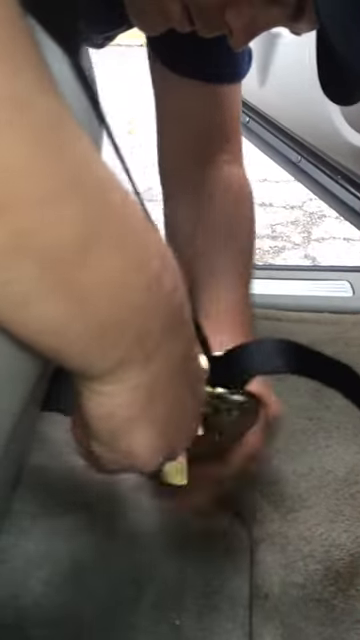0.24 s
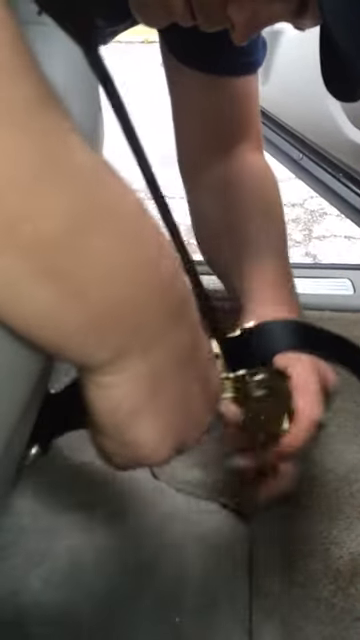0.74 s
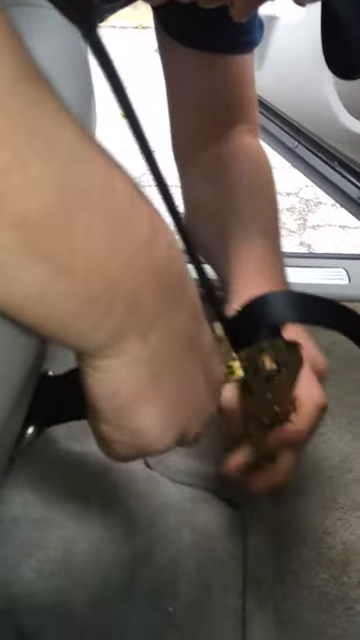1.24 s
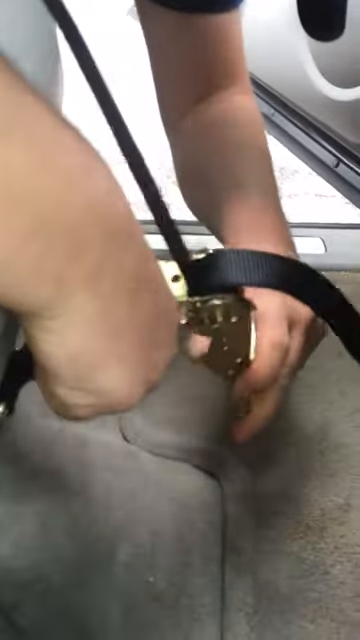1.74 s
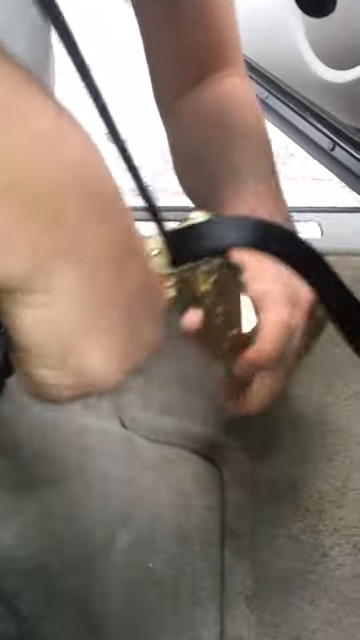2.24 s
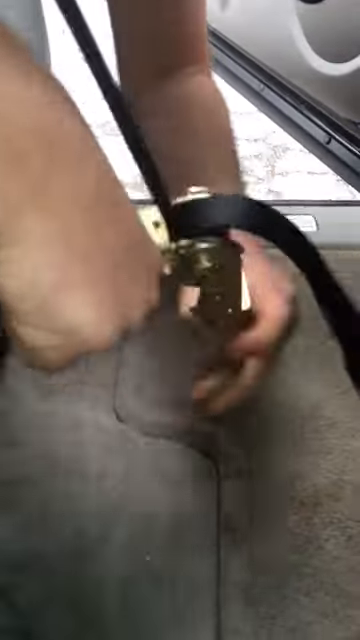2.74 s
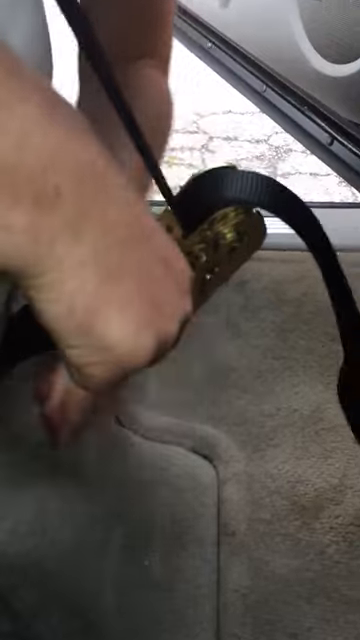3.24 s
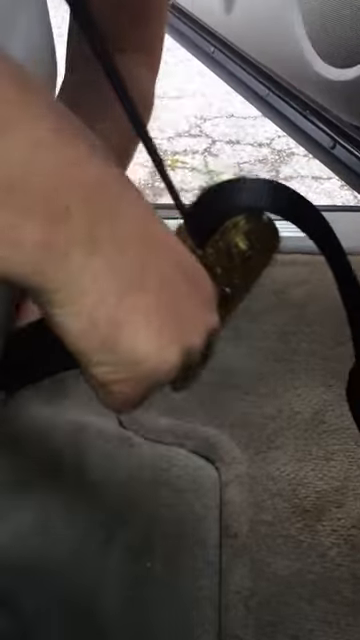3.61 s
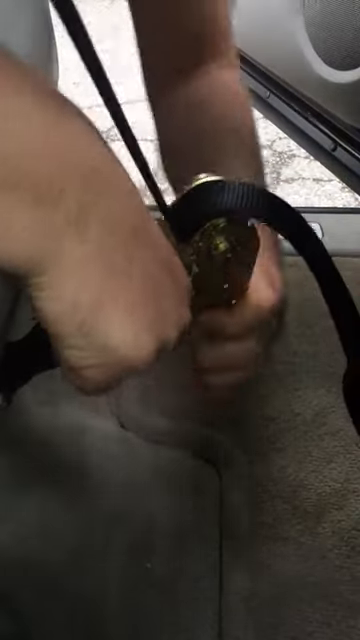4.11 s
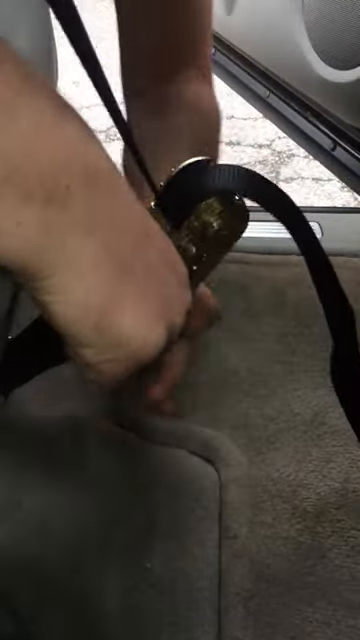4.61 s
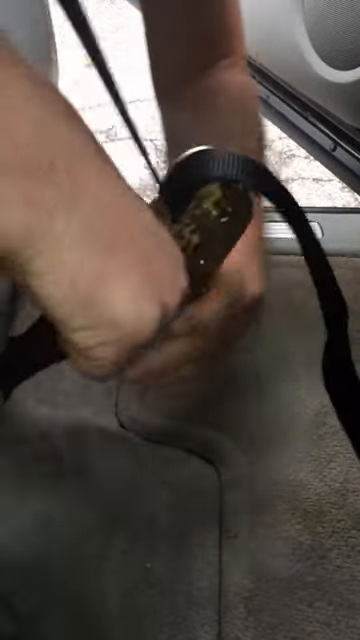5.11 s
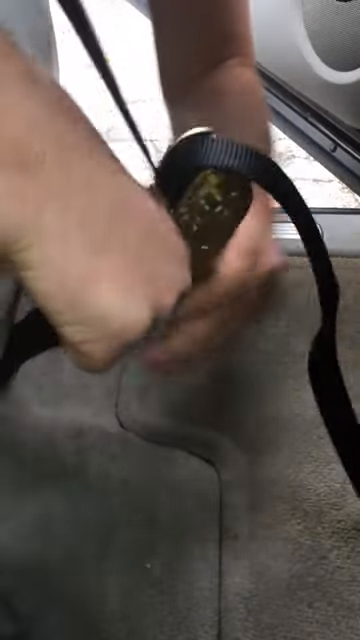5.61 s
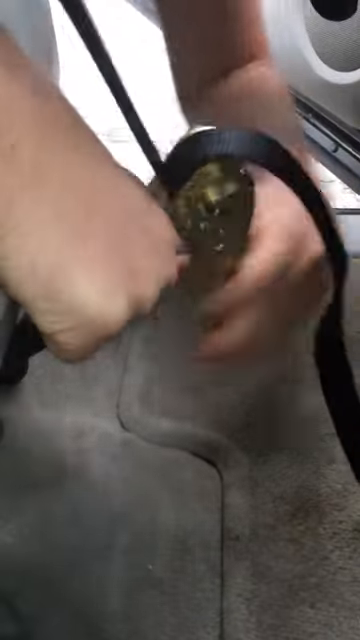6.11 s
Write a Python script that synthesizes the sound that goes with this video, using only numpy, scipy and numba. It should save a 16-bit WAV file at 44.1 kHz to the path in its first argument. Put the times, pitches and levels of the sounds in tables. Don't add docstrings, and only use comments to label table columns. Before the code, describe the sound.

Sharp metallic ratchet clicks in uneven pairs, with dull jolts, a clattering drop midway, then more cranking over a soft distant road hum.

```python
import sys
import numpy as np
from scipy import signal
from scipy.fft import rfft, irfft
from scipy.io import wavfile
from scipy.ndimage import uniform_filter1d
from numba import njit

SR = 44100
rng = np.random.default_rng(int(sys.argv[2]) if len(sys.argv) > 2 else 0)


def waveform_to_disk(signal):
    frames = np.transpose(np.atleast_2d(signal))
    scaled = np.clip(frames, -1, 1) * 32767
    samples = np.round(scaled).astype(np.int16)
    wavfile.write(sys.argv[1], SR, samples)


def natural_amplitude(level_db):
    exponent = np.asarray(level_db, float) / 20
    return 10 ** exponent


N = 280035


def tone_db(table, hz):
    table_hz, table_db = np.transpose(table)
    return np.interp(np.log(hz), np.log(table_hz), table_db)


def coloured(table):
    hz = np.arange(1, N // 2 + 2) * SR / N
    x = irfft(rfft(rng.standard_normal(N)) * natural_amplitude(tone_db(table, hz)), N)
    return x / np.std(x)


def band(x, lo_hz, hi_hz, order):
    return signal.sosfilt(signal.butter(order, [lo_hz, hi_hz], "band", fs=SR, output="sos"), x)


def highpass(x, hz, order):
    return signal.sosfilt(signal.butter(order, hz, "high", fs=SR, output="sos"), x)


def walk(rate):
    k = int(SR / rate)
    steps = np.repeat(rng.standard_normal(N // k + 1), k)
    return 1.1 * uniform_filter1d(uniform_filter1d(steps, k), k)[:N]


@njit
def ring_loop(n, start, pole, size, length):
    out = np.zeros(n)
    for k in range(len(start)):
        z = size[k] + 0j
        for i in range(start[k], min(n, start[k] + length[k])):
            out[i] += z.imag
            z *= pole[k]
    return out


def ring(s, hz, db, t60):
    s, hz, db, t60 = (v.ravel() for v in np.broadcast_arrays(s, hz, db, np.clip(t60, .002, 1)))
    turn = 2j * np.pi * np.clip(hz, 20, .45 * SR) / SR
    pole = np.exp(turn - np.log(1000) / (t60 * SR))
    audible = t60 * SR * np.clip((db + 85) / 60, 0, 1)
    start = np.maximum(s * SR, 0).astype(np.int64)
    return ring_loop(N, start, pole, natural_amplitude(db), audible.astype(np.int64))


# f/Hz, level/dB [per Hz]
OUTSIDE = [(25, -14.5), (60, -5.5), (100, -5), (300, -19), (650, -8.5), (1200, -15), (2200, -20),
           (3500, -27.5), (12000, -45), (16000, -57.5)]


def traffic():
    return coloured(OUTSIDE) * natural_amplitude(-59 + 0.56 * walk(0.92))


# t/s, f/Hz [band centre], level/dB
ROAD = [
    (0, 790, -60),
    (.5, 800, -61),
    (1.0, 680, -63),
    (1.5, 720, -68),
    (3.2, 960, -67),
    (6.35, 743, -73.5),
]


def road():
    s, *columns = np.transpose(ROAD)
    hz, db = (np.interp(np.arange(N) / SR, s, c) for c in columns)
    turn = 2 * np.pi * np.cumsum(hz * (1 + 0.03 * walk(5))) / SR
    return natural_amplitude(db) * (walk(330) * np.cos(turn) + walk(330) * np.sin(turn))


def whistle(notes, start, tremor_db):
    out = np.zeros(N)
    tremor = natural_amplitude(tremor_db * walk(45)) * (1 + .3 * walk(500))
    for s, length, hz0, hz1, db in notes:
        n, i = int(length * SR), int(s * SR)
        phase = 2 * np.pi * np.cumsum(np.linspace(hz0, hz1, n)) / SR
        swell = np.hanning(n) ** 0.22 * np.linspace(start, 1, n)
        out[i:i + n] += natural_amplitude(db) * swell * np.sin(phase)
    return out * tremor


# t/s, length/s, start f/Hz, end f/Hz, level/dB
BIRD = [
    (3.188, .025, 3800, 4300, -62),
    (3.203, .085, 3560, 3150, -58),
    (4.058, .15, 4630, 4630, -52),
    (4.28, .05, 3060, 3050, -58),
    (4.538, .1, 3390, 3330, -58),
    (4.635, .075, 3380, 3260, -57),
]


def bird():
    return whistle(BIRD, start=.45, tremor_db=1.6)


# t/s, rumble level/dB
HANDS = [(0.0, -71), (0.74, -55), (1.18, -67), (1.64, -66), (1.86, -65), (2.03, -72.5), (2.6, -64),
         (2.97, -48.5), (3.16, -81), (3.43, -49.5), (3.66, -40.5), (4.05, -53), (4.46, -48), (5.31, -68.5),
         (6.07, -52.5), (6.35, -42)]


def handling():
    rumble_db = np.interp(np.arange(N) / SR, *np.transpose(HANDS)) - 1.5
    spectrum = [(25, -21.5), (60, 8.5), (110, 7.5), (200, -3.5), (450, -9.5), (900, -37.0)]  # (Hz, dB per Hz)
    return coloured(spectrum) * natural_amplitude(rumble_db + 0.62 * walk(25))


# t/s [middle], half width/s, level/dB
RUSTLES = [
    (3.387, 0.042, -63),
    (3.46, 0.025, -64.5),
    (3.83, 0.056, -65),
    (0.061, 0.035, -72),
    (4.298, 0.069, -61),
    (4.879, 0.042, -67),
    (6.05, 0.21, -64),
]


def webbing():
    t = np.arange(N) / SR
    slide = natural_amplitude(-77)
    for s, half_width, db in RUSTLES:
        slide = slide + natural_amplitude(db) * np.exp(-((t - s) / half_width) ** 2)
    grains = rng.standard_normal(N) * natural_amplitude(1.8 * walk(230))
    return band(grains, 3100, 10000, order=2) * slide * natural_amplitude(5.5 + 2.6 * walk(12))


def cabin(x):
    t = np.arange(int(.25 * SR)) / SR
    noise = rng.standard_normal(len(t))
    tail = band(noise, 210, 3300, order=1) * natural_amplitude(-60 * t / .13)
    tail += 0.25 * band(noise, 4000, 14000, order=1) * natural_amplitude(-60 * t / 0.011)
    tail += 0.026 * band(noise, 4500, 15000, order=1) * natural_amplitude(-60 * t / 0.37)
    tail *= 1 - np.exp(-t / 0.0012)
    return signal.fftconvolve(x, tail / np.linalg.norm(tail))[:N]


# t/s, push level/dB, direction [sign]
JOLTS = [(0.1602, -30, -1), (0.3973, -26, -1), (0.67, -21.5, -1), (0.764, -23, -1), (0.8681, -7.5, -1),
         (0.9047, -11, -1), (1.1768, -15.5, 1), (1.4215, -23.5, -1), (1.6711, -7.5, 1), (1.742, -23.5, -1),
         (1.9797, -7, -1), (2.0545, -35, 1), (2.3056, -6.5, 1), (2.544, -38, -1), (2.8117, -9, 1),
         (3.0636, -10, -1), (4.9867, -28, 1), (5.2506, -13.5, -1), (5.506, -28.5, 1), (5.6873, -10.5, 1),
         (5.77, -40, 1)]
# t/s, level/dB, direction [sign], f/Hz
SNAPS = [(0.3977, -26.5, -1, 890), (0.6677, -22.5, -1, 475), (0.6684, -24.5, 1, 480),
         (0.7653, -23.5, -1, 603), (.7675, -22, 1, 420), (.8663, -15.5, 1, 520), (.8672, -6, -1, 400),
         (0.9014, -10.5, 1, 352), (.904, -14.5, -1, 503), (1.1752, -22, 1, 590), (1.4204, -16, -1, 600),
         (1.422, -16.5, 1, 507), (1.6689, -10.5, 1, 452), (1.7419, -23, -1, 600), (1.9782, -27, -1, 446),
         (1.9802, -9.5, 1, 350), (2.0548, -34, 1, 610), (2.305, -12.5, 1, 358), (2.5454, -10.5, -1, 470),
         (2.8116, -11, -1, 426), (3.0637, -12.5, 1, 430), (4.9874, -24.5, 1, 400), (5.248, -11, 1, 588),
         (5.505, -19, -1, 558), (5.6858, -14, -1, 417), (5.7702, -23, -1, 560)]


def jolts():
    t, push = np.arange(-500, 500) / SR, np.zeros(N)
    rattle = band(rng.standard_normal(N), 230, 1300, order=1) * 4
    for s, db, way in JOLTS:
        i = int(s * SR) - 500
        push[i:i + 1000] += np.sign(way) * natural_amplitude(db - 2.5) * np.exp(-(t / 0.002) ** 2)
    for s, db, way, hz in SNAPS:
        i = int(s * SR) - 500
        wiggle = natural_amplitude(db - 1.5) * np.exp(-(t * hz / 0.41) ** 2) * np.cos(2 * np.pi * hz * t)
        crack = natural_amplitude(db - 1.0) * np.exp(-(t / 0.00035) ** 2) * np.sin(2 * np.pi * 1700 * t)
        shake = natural_amplitude(db - 10.5) * np.exp(-abs(t) / 0.0021) * rattle[i:i + 1000]
        push[i:i + 1000] += np.sign(way) * (wiggle + crack + shake)
    mount_hz, rebound_hz = 39.55, 30
    swing = signal.sosfiltfilt(signal.butter(2, mount_hz, "high", fs=SR, output="sos"), push)
    return highpass(swing, rebound_hz, order=1)


# t/s, trim level/dB, hook ring level/dB, carpet thud level/dB
KNOCKS = [(0, -47, -33.5, -87.5), (5.201, -60, -80, -36), (5.22, -34, -80, -32.5), (3.309, -76, -85, -42.5),
          (0.544, -35, -39, -90), (0.842, -28, -68.5, -57.5), (5.715, -40, -70, -34.5),
          (1.583, -32.5, -25, -75), (1.795, -25.5, -54, -57), (1.811, -34, -77, -36),
          (1.894, -33, -50, -32), (2.56, -29, -55.5, -35.5), (2.86, -25.5, -40, -27.5),
          (2.87, -24.5, -66, -42), (3.072, -27, -77, -29.5), (3.099, -38.5, -77, -31),
          (3.488, -11, -43, -39.5), (3.496, -14, -60, -20), (3.508, -20.5, -56, -19.5),
          (3.567, -19.5, -60, -21), (3.62, -23.5, -63.5, -27), (3.633, -36.5, -72.5, -30),
          (3.699, -37, -61, -34), (3.771, -25, -66, -24.5), (3.797, -44, -72, -33), (3.877, -27, -55, -65),
          (3.893, -45, -63, -27), (6.206, -44, -61, -30.5)]
# f/Hz, level/dB, t60/s
TRIM = [(400, 1.5, 0.059), (520, 4.5, 0.055), (673, 2, 0.08), (870, -1.5, 0.097), (1157, 4, 0.025),
        (1438, 2, 0.052), (1750, 3, 0.027), (2310, 0, 0.044), (3140, -6, 0.055)]
# f/Hz, level/dB, t60/s
HOOK = [(3241, -13, .12), (5270, -8, .2), (6562, -10, .14), (8522, -13, .14), (11070, -4, .1),
        (12920, -22, .08)]
# f/Hz, level/dB, t60/s
CARPET = [(85, -38, 0.049), (125, -4.5, 0.16), (165, -9.5, 0.14), (233.6, 5.5, 0.11)]


def hook():
    s, *levels = np.transpose(KNOCKS)[:, :, None]
    out = 0
    for db, body, spread in zip(levels, (TRIM, HOOK, CARPET), (.07, .0006, 0.11)):
        hz, mode_db, t60 = np.tile(np.transpose(body), 8)
        luck = rng.standard_normal((len(s), 3, len(hz)))
        late_s = 0.004 * abs(luck[:, 2])
        strike_db = db + mode_db - 19.0 + 2 * luck[:, 1]
        out = out + ring(s + late_s, hz * (1 + spread * luck[:, 0]), strike_db, t60)
    return out


# t/s, f/Hz, level/dB, t60/s
SQUEAKS = [
    (1.797, 673, -46, 0.066),
    (1.801, 244, -54, 0.088),
    (3.492, 478, -32, 0.021),
    (3.504, 156, -32.5, 0.084),
    (3.63, 146, -41, 0.1),
    (1.895, 673, -49, 0.14),
    (4.715, 1906, -36.5, 0.028),
    (4.715, 3995, -30, 0.027),
]
# t/s, f/Hz, level/dB, t60/s
RINGS = [
    (3.775, 6100, -67, .6),
    (3.985, 8060, -67, .45),
    (3.495, 5300, -41, .25),
    (1.59, 5270, -41, .3),
    (1.797, 1432, -55, .4),
    (1.797, 2148, -47, .27),
    (1.797, 2530, -52, .5),
    (1.797, 3241, -54, .22),
]


def squeaks():
    s, hz, db, t60 = np.transpose(SQUEAKS)[:, :, None]
    luck = rng.standard_normal((len(s), 2, 6))
    pings = ring(s + 0.0024 * abs(luck[:, 0]), hz * (1 + 0.0031 * luck[:, 1]), db + 8.5, t60)
    return pings + ring(*np.transpose(RINGS))


# t/s, length/s, start f/Hz, end f/Hz, level/dB
SQUEALS = [
    (3.066, 0.033, 2730, 2660, -28.5),
    (6.243, 0.038, 1696, 1535, -31),
    (6.25, 0.019, 3330, 3190, -25),
]


def squeals():
    return whistle(SQUEALS, start=1, tremor_db=0.93)


# t/s, slip level/dB, fall/ms, landing level/dB
LOADED = [(.152, -10, 5.4, -11.5), (.3917, -9.5, 4.9, -10.5), (.6598, -15, 6.7, -8),
          (.8601, -10, 7.2, -13.5), (.9002, -12, 4.3, -7.5), (1.1632, -15, 8.8, -10),
          (1.4163, -6, 0.73, -6.5), (1.656, -22.5, 9.4, -8.5), (1.7344, -10.5, 5.3, -7.5),
          (1.9705, -16.5, 5.9, -8.5), (2.0364, -19.5, 13.7, -7.5), (2.2943, -18, 11, -9.5),
          (2.5362, -24.5, 5.5, -5), (2.8034, -19.5, 6.4, -9.5), (3.0586, -5.5, 2.02, -21.5),
          (4.398, -22, 6.2, -12.5), (4.9838, -18.5, 4, -9.5), (5.2397, -20, 7.6, -7.5),
          (5.4979, -6.5, 6.2, -12), (5.753, -24, 15.2, -8.5)]
# t/s, slip level/dB, fall/ms, landing level/dB
FREE = [(.3351, -22, 3.3, -19), (0.5776, -41, 6.3, -18.5), (.73, -23, 12, -20), (1.1024, -22.5, 6.3, -28.5),
        (1.2892, -35, 9.8, -22), (1.4408, -20, 6.9, -6), (1.888, -30.5, 9.8, -22), (2.236, -12, 8.7, -15),
        (2.421, -26, 11, -21.5), (2.7546, -19.5, 3.6, -16.5), (2.9725, -22.5, 8.1, -18),
        (3.0027, -20, 8.4, -21), (4.216, -24.5, 11.4, -24.5), (4.432, -16.5, 5.9, -12),
        (4.7105, -21, 5, -10.5), (4.9706, -25.5, 8.2, -17.5), (5.154, -26, 7.1, -27),
        (5.1721, -22.5, 6.1, -13), (5.483, -21, 9, -18.5), (5.9989, -13, 11.6, -10.5),
        (6.2288, -20, 6, -21), (6.2403, -16.5, 14, -14)]


def tooth_falls():
    rows = []
    for table, slip_bright_db, land_bright_db in ((LOADED, 9.5, 5.5), (FREE, 3, 4.5)):
        for s, slip_db, fall_ms, land_db in table:
            rows.append((s, slip_db, slip_bright_db))
            rows.append((s + fall_ms / 1000, land_db, land_bright_db))
    return rows


# t/s, level/dB
CLICKS = [(0.1036, -18), (0.1461, -23), (0.3221, -22), (0.385, -23.5), (0.6142, -10.5), (0.762, -10),
          (0.797, -21), (0.9, -22), (.927, -24), (1.0714, -11.5), (1.1522, -28), (1.7278, -20),
          (1.9894, -18.5), (2.2252, -20.5), (2.2842, -15.5), (2.4403, -24), (2.7229, -14.5), (2.7928, -22),
          (2.8827, -17.5), (3.7119, -11.5), (3.882, -19), (4.201, -21), (4.3454, -19.5), (4.3913, -20),
          (4.7727, -10), (5.403, -24), (5.686, -10.5), (6.0965, -13), (6.1989, -23)]
# t/s, level/dB
TICKS = [(0.3029, -30), (0.5424, -34), (.776, -35), (.885, -24), (1.0393, -37), (1.3054, -28),
         (1.3445, -33), (1.5816, -25.5), (1.7953, -35), (2.1277, -30), (2.1704, -32), (2.4603, -32),
         (2.576, -26.5), (2.702, -33), (2.747, -26), (2.86, -30.5), (3.082, -25), (3.093, -26.5),
         (3.7337, -29), (3.9815, -32.5), (4.1564, -28.5), (4.268, -33.5), (5.426, -32.5), (5.6623, -37),
         (5.9008, -32.5), (5.9271, -31), (6.269, -27.5), (6.3055, -30)]
# t/s, level/dB, brightness/dB
CLUNKS = [
    (3.4826, -34, -48),
    (3.4888, -11, -15.5),
    (3.4918, -25.5, -27),
    (3.5, -20, -25),
    (3.535, -50, -21),
    (3.563, -28.5, -40),
    (3.5811, -50, -18),
    (3.6213, -48.5, -16),
    (3.7693, -46, -22),
]


def single_touches():
    clicks = [(s, db, 5) for s, db in CLICKS]
    ticks = [(s, db, 0) for s, db in TICKS]
    return [*CLUNKS, *clicks, *ticks]


# t/s, level/dB
GRAZES = [(0.0187, -45.5), (0.048, -60), (.0743, -53), (0.0877, -31.5), (0.11, -27.5), (.137, -36),
          (.571, -38), (.603, -35), (0.827, -43), (1.064, -40.5), (1.266, -50), (1.285, -47), (1.3876, -43),
          (1.402, -34.5), (1.555, -62), (1.574, -48), (1.601, -40), (1.61, -37), (1.621, -49), (1.921, -35),
          (1.943, -44), (1.951, -38), (1.960, -25), (2.152, -47), (2.1608, -38.5), (2.204, -46),
          (2.2462, -17), (2.314, -30.5), (2.4834, -48), (2.595, -48), (2.6085, -44.5), (2.639, -46),
          (2.651, -52), (2.711, -36), (2.9387, -35), (2.951, -38), (3.0094, -22.5), (3.241, -50.5),
          (3.255, -48.5)]
# t/s, level/dB
TIGHT_GRAZES = [(3.774, -55), (3.7928, -51), (3.826, -56), (4.008, -52), (4.0274, -58), (4.255, -42),
                (4.2882, -44), (4.3028, -49), (4.499, -47.5), (4.766, -42), (4.864, -47), (4.872, -50),
                (4.889, -42), (4.9017, -35), (4.9204, -42), (4.948, -35), (4.958, -40.5), (5.12, -50),
                (5.1353, -54), (5.1468, -38.5), (5.441, -40.5), (5.727, -37.5), (5.741, -47), (5.914, -36),
                (5.9413, -35), (5.957, -41), (5.9874, -33.5), (6.1883, -43), (6.292, -36)]


def grazes():
    bright_db, chatter_s = 3, 0.084
    return [(s, db - 1, bright_db, chatter_s) for s, db in [*GRAZES, *TIGHT_GRAZES]]


# t/s [start], length/s, level/dB
DRAGS = [(0.076, 0.042, -47.5), (0.358, 0.018, -45), (0.595, 0.01, -39), (0.62, .039, -43),
         (0.824, 0.034, -40.5), (1.117, 0.032, -48.5), (1.256, 0.023, -60.5), (1.375, 0.027, -38),
         (1.591, 0.077, -42), (1.718, .0074, -50), (1.926, 0.052, -35.5), (2.172, .04, -52),
         (2.438, 0.011, -46), (2.517, 0.016, -48.5), (2.54, 0.057, -54.5), (2.841, 0.022, -46.5),
         (2.93, 0.043, -46.5), (3.037, .017, -38.5), (3.737, 0.022, -45), (4.24, 0.062, -47),
         (4.465, 0.04, -44.5), (4.876, 0.085, -50.5), (5.187, 0.062, -34), (5.453, 0.024, -50.5),
         (5.705, 0.068, -37), (5.915, 0.064, -48)]


def drag_catches(chatter_s):
    s, length, db = np.transpose(DRAGS)[:, :, None]
    place = (np.arange(7) + rng.random((len(s), 7))) / 7
    swell_db, scatter_db, bright_db = 2.5, 0.4, -8.5
    db = db + swell_db * (place - .5) + scatter_db * rng.standard_normal(place.shape)
    catches = np.broadcast_arrays(s + length * place, db, bright_db, chatter_s)
    return np.transpose([c.ravel() for c in catches])


def contacts():
    chatter_s = 0.04
    full = [(*row, chatter_s) for row in tooth_falls() + single_touches()]
    return np.transpose(np.concatenate([full, grazes(), drag_catches(chatter_s)]))


# f/Hz, level/dB [per Hz]
STEEL = [(410, -50), (700, 9), (934, -35.5), (1770, -12), (2370, -13), (2880, -4.5), (5330, -1.5),
         (9730, 0), (14800, -3.5), (16000, -9.5)]
# f/Hz, level/dB
BUCKLE = [(3900, -6), (5400, 2), (6170, 7), (6820, 5), (9850, -3), (13400, -12)]


def pawl():
    s, db, bright_db, chatter_s = contacts()[:, :, None, None]
    bounces, modes = 12, 16
    chance = rng.random((len(s), 2, bounces, modes))
    luck = rng.standard_normal((len(s), 2, bounces, modes))

    order = (np.arange(bounces)[:, None] + chance[:, 0, :, :1]) / bounces
    late_s = .036 * order ** 2.0
    onset_db = 20 * np.log10(1 - 0.8 * np.exp(-late_s / 0.0006))
    bounce_db = onset_db - 60 * late_s / chatter_s + 2.9 * luck[:, 0, :, :1]

    hz = 800 + 14800 * (np.arange(modes) + chance[:, 1]) / modes
    tilt = (bright_db - 3.5) * 0.67
    mode_db = tone_db(STEEL, hz) + tilt * np.log2(np.maximum(hz, 2400) / 6500)
    mode_db += 2.17 * luck[:, 1] + bounce_db
    mode_db -= 90 * late_s * np.log2(hz / 6500)
    mode_db -= 0.85 * np.maximum(-14.5 - db, 0) * np.log2(np.maximum(hz / 10000, 1))
    mode_db += 6 * np.cos(2 * np.pi * (hz / 6200 + chance[:, 0, :1, 1:2]))
    first_power = natural_amplitude(mode_db[:, :4]) ** 2 * (hz[:, :4] > 2500)
    mode_db -= 10 * np.log10(np.sum(first_power, axis=(1, 2), keepdims=True))
    strike_s = s + late_s + 0.00068 * chance[:, 0]
    plates = ring(strike_s, hz, db + mode_db + 4.5, 0.017 * (hz / 6500) ** -.4)

    frame_hz, frame_db = np.transpose(BUCKLE)
    spot = rng.standard_normal((len(s), 2, 1, len(BUCKLE)))
    frame_db = frame_db + tilt * np.log2(frame_hz / 6500) + 3 * spot[:, 1]
    frame = ring(s + .0008, frame_hz * (1 + 0.02 * spot[:, 0]), db + frame_db - 17, 0.026)
    return plates + frame


def scene():
    steel = highpass(pawl(), 1100, order=4)
    near = steel + hook() + squeaks()
    inside = near + natural_amplitude(-18.5) * cabin(near) + squeals() + jolts() + handling() + webbing()
    outside = traffic() + road() + bird()
    return (inside + outside)[None]


def top_cut(x):
    return signal.sosfilt(signal.butter(12, 16460, fs=SR, output="sos"), x)


def record(dry):
    firm = highpass(dry, 30, order=2)
    soft = .72 * np.tanh(firm / .72)
    cut = signal.sosfilt(signal.ellip(6, .3, 26, 15300, fs=SR, output="sos"), soft)
    return top_cut(cut)


dry = scene()
out = record(dry)
waveform_to_disk(out)
```